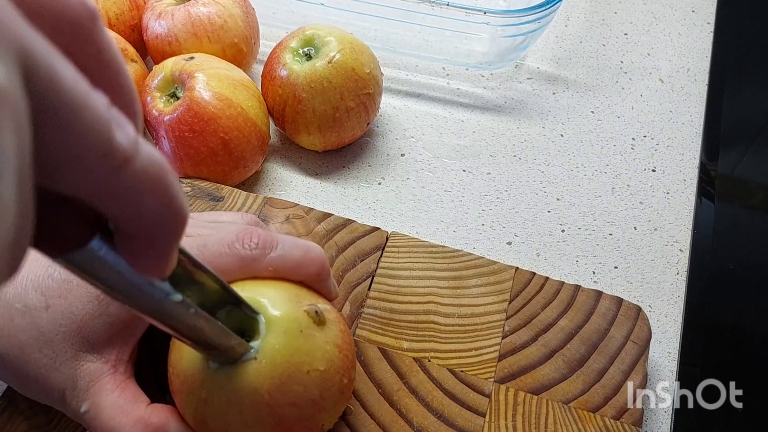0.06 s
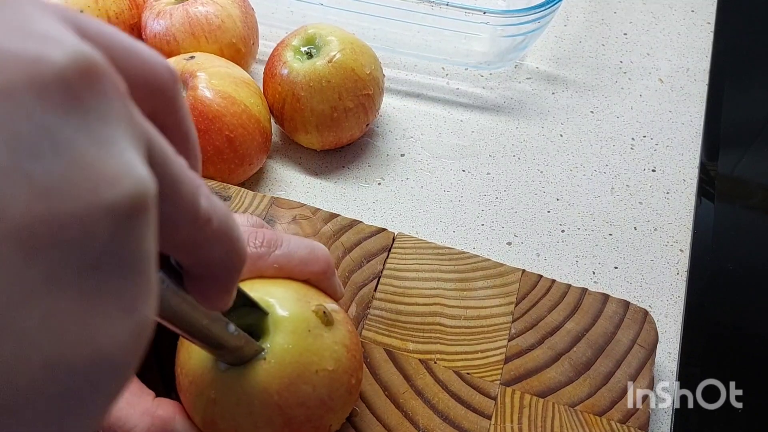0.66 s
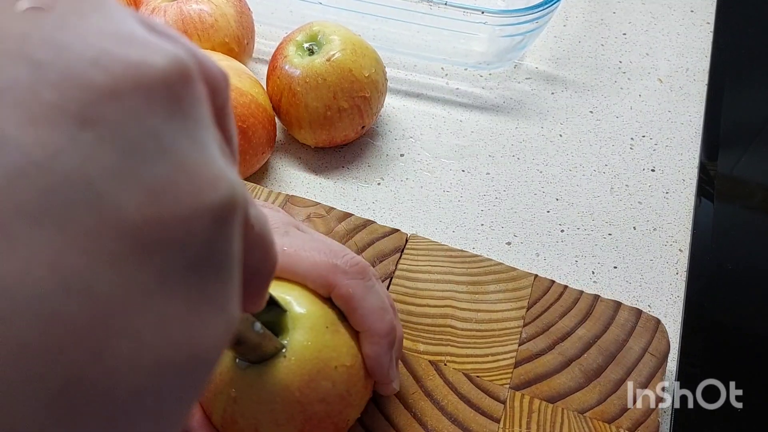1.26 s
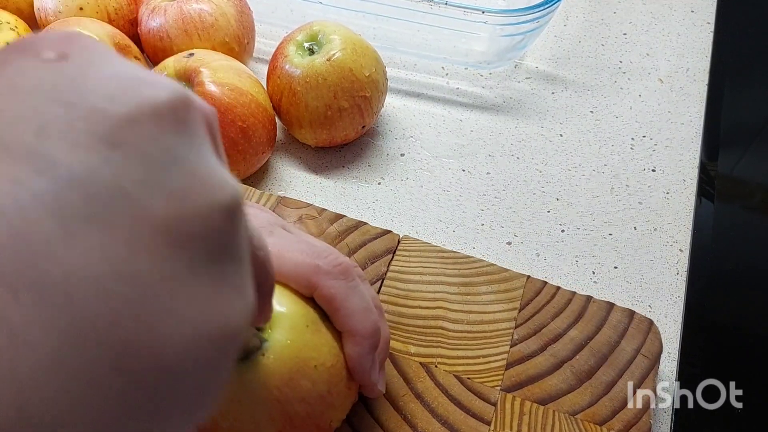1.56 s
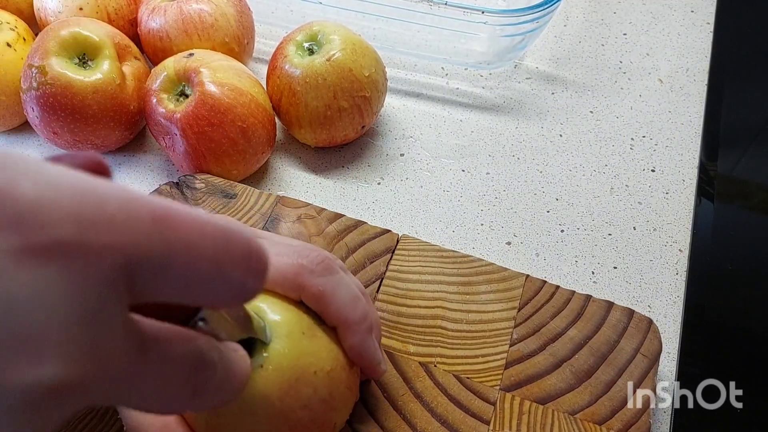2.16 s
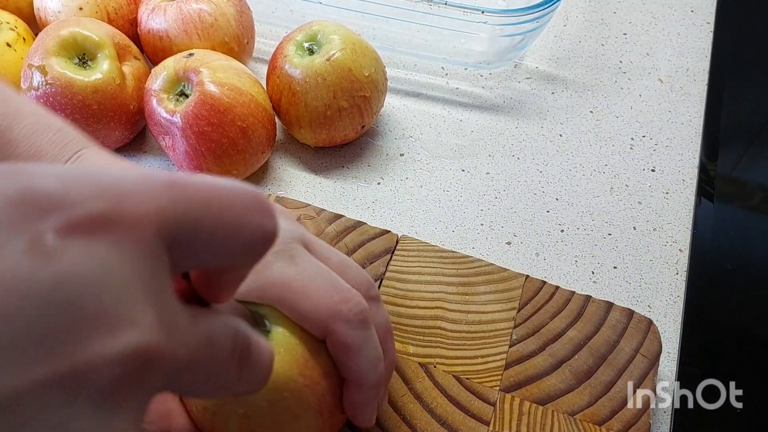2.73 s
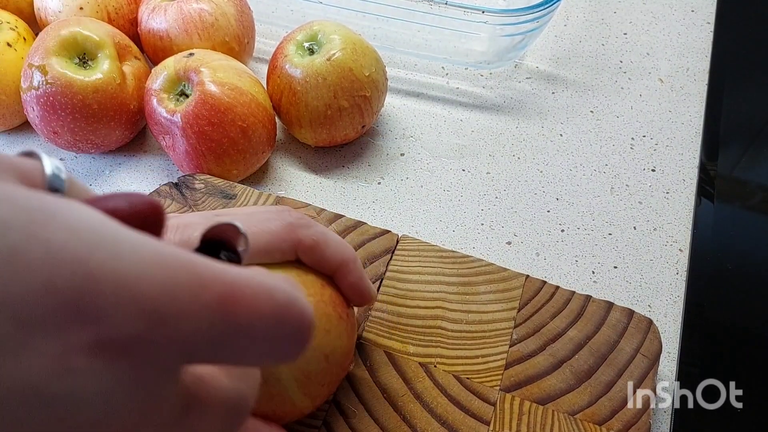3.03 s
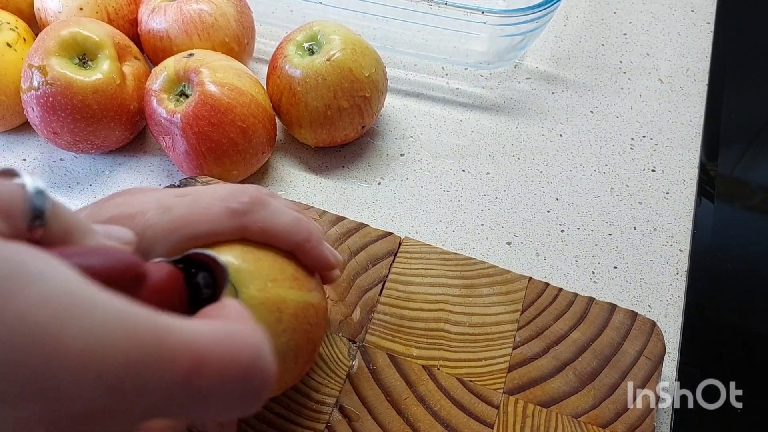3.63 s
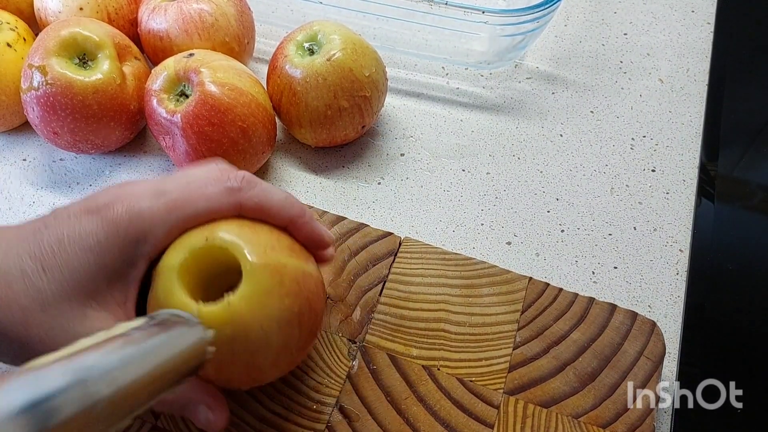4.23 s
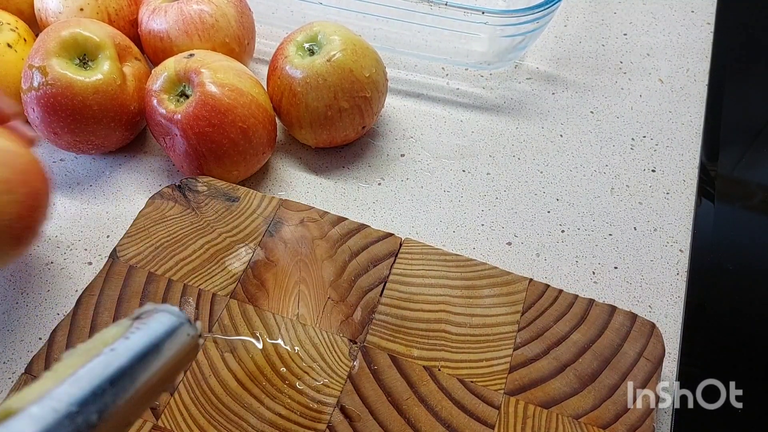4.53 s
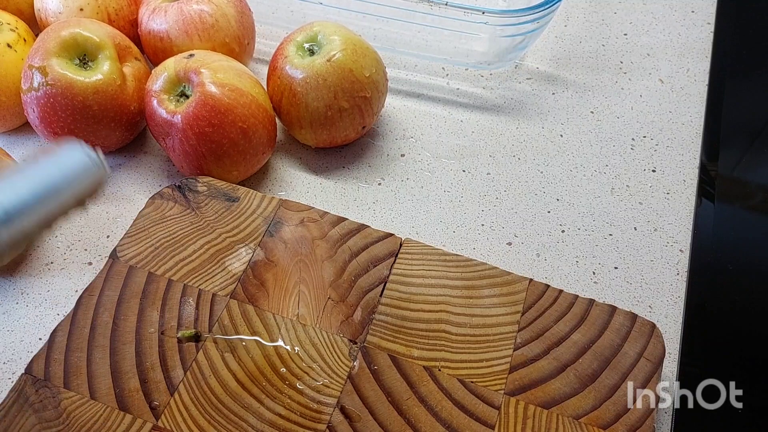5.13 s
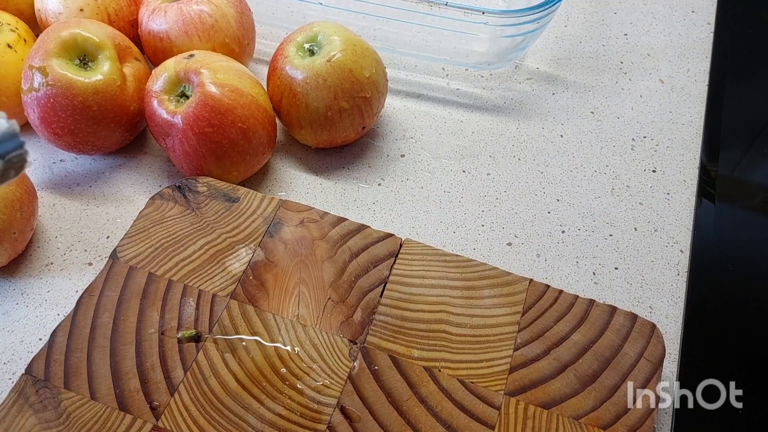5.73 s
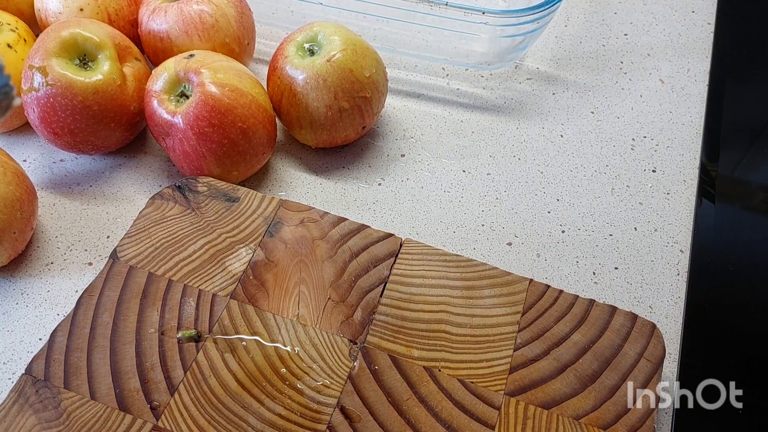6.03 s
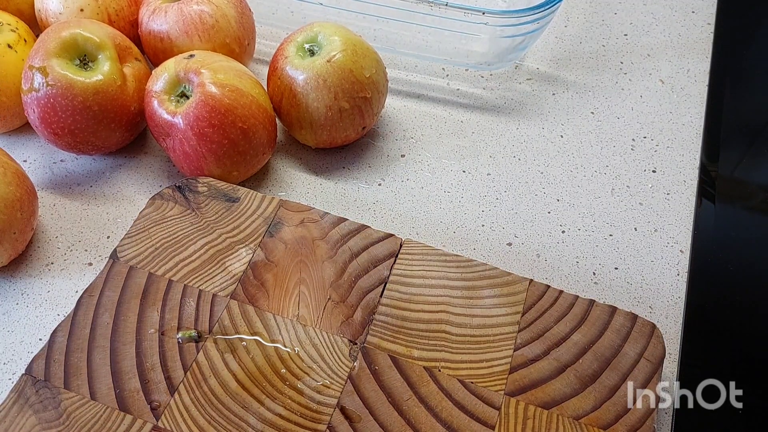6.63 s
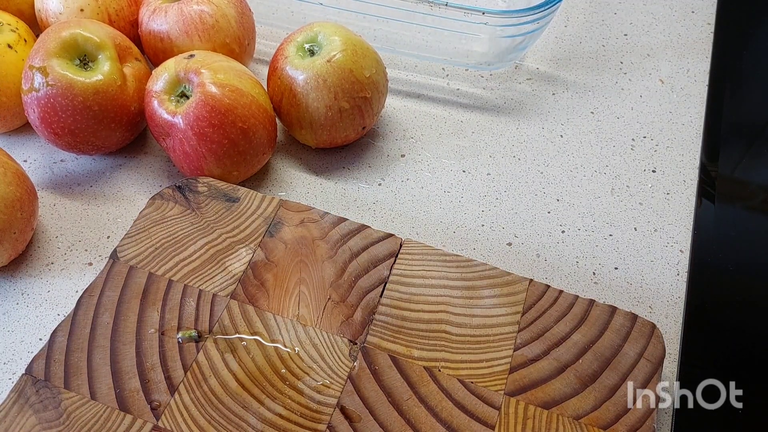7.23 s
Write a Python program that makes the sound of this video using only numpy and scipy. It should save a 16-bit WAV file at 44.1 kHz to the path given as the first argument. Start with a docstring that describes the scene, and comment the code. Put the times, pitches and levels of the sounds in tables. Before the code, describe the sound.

A faint low appliance hum runs throughout in a kitchen. Close by, a soft wet hiss leads to a sharp crunch and thump at 0.35 seconds as a steel corer bites into an apple. At 1.6 seconds a second crunch comes with a loud knock as the tube breaks through and briefly rings the wooden board. From 2 to 4 seconds the corer twists in faint swells of wet hiss, with a light tap and thump around 2.3. A soft suck sinks in pitch at 4 seconds, and the corer clacks free at 4.3, followed by a small thump at 4.7. Farther off, something knocks four times, always alike, at about 2.6, 3.2, 5.1 and 5.8 seconds. Soft distant bumps, a few tiny ticks and very faint high chirps are scattered through, lasting until about 7 seconds.

```python
"""A faint wet hiss, then a crunch: a steel corer is pushed through an apple on a wooden board. Cells burst
and the tube breaks through, ringing the wood. The corer is twisted and drawn out with a wet hiss of
friction, then clacks as it comes free. Something further off in the kitchen knocks four times, always
alike. Small bumps, faint high chirps and ticks, and a low appliance hum lie beneath."""
import sys
import numpy as np
from scipy import signal
from scipy.fft import rfft, irfft, next_fast_len
from scipy.io import wavfile
from scipy.ndimage import map_coordinates

SR = 44100
rng = np.random.default_rng(int(sys.argv[2]) if len(sys.argv) > 2 else 0)


def pcm_store(signal):
    """Save signal as 16-bit PCM."""
    levels = np.round(np.clip(np.atleast_2d(signal), -1, 1) * 32767)
    wavfile.write(sys.argv[1], SR, levels.astype(np.int16).T)


N = 321296
TIME_S = np.arange(N) / SR
TAIL_S = np.arange(SR // 2) / SR  # time since an impact


def amp(db):
    """Decibels to gain."""
    return 10 ** (np.asarray(db) / 20)


def unit(x):
    """Scaled to rms 1."""
    return x / np.sqrt(np.mean(x ** 2) + 1e-20)


def along(points, hz):
    """(f/Hz, value) points read on a log axis."""
    f, value = np.transpose(points)
    return np.interp(np.log(hz + 1), np.log(f + 1), value)


def filtered(x, response):
    """x through a zero-phase frequency response."""
    size = x.shape[-1]
    padded = next_fast_len(size + 8192)
    return irfft(rfft(x, padded) * response(np.fft.rfftfreq(padded, 1 / SR)), padded)[..., :size]


def noise(size=N):
    """Two channels of white noise."""
    return rng.standard_normal((2, size))


def wobble(rate_hz):
    """Smooth random curve, rate_hz knots a second."""
    coarse_s = TIME_S[::16]
    knots = rng.standard_normal(int(N * rate_hz / SR) + 4)
    return np.interp(TIME_S, coarse_s, map_coordinates(knots, [coarse_s * rate_hz]))


def swell(t, width_s, shape=2):
    """Bell around time t; a higher shape has a flatter top and shorter skirts."""
    return np.exp(-.5 * np.minimum(abs((TIME_S - t) / width_s), 10) ** shape)


def onset(attack_s):
    """Soft rise from 0 to 1."""
    return 1 - np.exp(-TAIL_S / attack_s)


def mode(hz, db, t60_s, attack_s=0.0011, phase=0):
    """One damped resonance."""
    envelope = onset(attack_s) * np.exp(-np.log(1000) * TAIL_S / t60_s)
    return amp(db) * envelope * np.sin(2 * np.pi * hz * TAIL_S + phase)


def add(track, t, sound):
    """Mixes a sound into the track at time t."""
    span = track[:, round(t * SR):][:, :sound.shape[-1]]
    span += sound[..., :span.shape[-1]]


# left-right likeness: f/Hz, correlation
COHERENCE = [(30, .5), (100, 0.95), (300, 0.58), (700, .5), (1500, -0.15), (4000, 0)]
def coloured(pair, spectrum):
    """Two unrelated signals become a stereo pair of rms 1, alike in the bass."""
    def response(hz):
        angle = np.arccos(np.clip(along(COHERENCE, hz), -1, 1)) / 2
        return amp(along(spectrum, hz)) * [np.cos(angle), np.sin(angle)]
    mid, side = filtered(pair, response)
    return unit(np.array([mid + side, mid - side]))


def grains(spectrum, per_s):
    """Tiny clicks of random size."""
    return coloured(noise() * (rng.random((2, N)) < per_s / SR), spectrum)


# kitchen decay: f/Hz, t60/s
ROOM_DECAY = [(100, 0.62), (500, 0.28), (1500, 0.3), (5000, 0.25), (15000, 0.14)]
def wash(spectrum, t60_scale):
    """A dying burst of noise; the treble dies first."""
    hz, t, bands = signal.stft(coloured(noise(len(TAIL_S)), spectrum), SR, nperseg=256)
    fade_db = -60 * t / (t60_scale * along(ROOM_DECAY, hz)[:, None])
    return signal.istft(bands * amp(fade_db), SR, nperseg=256)[1][:, :len(TAIL_S)]


def ring(modes, t60_scale, apart_hz):
    """Modes ring out; the higher ones arrive left and right out of step."""
    out = np.zeros((2, len(TAIL_S)))
    for hz, db in modes:
        phase = rng.uniform(0, 2 * np.pi) + np.array([[1], [-1]]) * hz / apart_hz * rng.normal(.22, .34)
        out += mode(hz, db, t60_scale * along(ROOM_DECAY, hz), attack_s=0.0012, phase=phase)
    return out


# appliance partials: f/Hz, level/dB
HUM_PARTIALS = [(99, -57), (198, -59), (301, -65.5), (345, -67.5)]
# brief dips of the hum: t/s, width/s, level/dB
HUM_DIPS = [(6.336, 0.075, -23), (7.224, 0.12, -7)]
# room rush: f/Hz, level/dB
RUSH_SPECTRUM = [(25, -23.5), (55, -6.5), (110, 5.5), (160, -8.5), (210, 4.5), (260, -6), (330, -2.5),
                 (420, -10.5), (650, -11.5), (1200, -15), (2000, -30), (3000, -39.5), (6000, -40.5),
                 (9000, -41.5), (10500, -38), (12000, -41.5), (15500, -44)]
def humming():
    """A wavering mains hum in the low rush of the kitchen."""
    hum = np.zeros(N)
    for hz, db in HUM_PARTIALS:
        peak = np.sqrt(2) * amp(db + 2 * wobble(6.2))
        hum += peak * np.sin(2 * np.pi * hz * TIME_S + 0.59 * wobble(10))
    dips_db = sum(db * swell(t, width_s) for t, width_s, db in HUM_DIPS)
    rush = amp(-53.5 + .7 * wobble(3)) * coloured(noise(), RUSH_SPECTRUM)
    return amp(.5 + dips_db) * hum + rush


# swells of fine hiss, the one at 2.6 s around the first knock: t/s, rise/s, fall/s, level/dB
HISS_SWELLS = [(.02, 0.066, 0.053, -62), (.6, 0.12, 0.11, -69), (1.22, 0.029, 0.057, -73),
               (1.47, 0.084, 0.046, -69.5), (2.1, 0.07, 0.081, -57.5), (2.39, 0.025, 0.037, -67.5),
               (2.6, 0.023, 0.057, -63), (2.882, 0.0448, 0.044, -56), (2.974, 0.06, 0.045, -50.5),
               (3.568, 0.029, 0.058, -56), (3.97, 0.057, 0.1, -64), (5.97, .035, 0.024, -69)]
# fine wet hiss: f/Hz, level/dB
HISS_SPECTRUM = [(1500, -23), (3000, -1), (4500, 2.5), (6500, -3), (8800, -5), (10500, 0), (12300, 1),
                 (15500, -6.5)]
# hollow body: f/Hz, level/dB
BODY_SPECTRUM = [(300, -18.5), (500, -10), (630, -3.5), (820, -12.5), (1150, -3.5), (1490, -2),
                 (1750, -6.5), (2130, -8), (3000, -12.5), (6000, -28)]
# body gain as the tube sinks in: t/s, level/dB
BODY_GROWTH = [(0, 1), (3, 5)]
def hissing():
    """Swells of fine hiss with a hollow body; all but the one at 2.6 s are steel sliding in wet flesh."""
    swells = [amp(db) * swell(t, np.where(TIME_S < t, rise_s, fall_s), shape=1.7)
              for t, rise_s, fall_s, db in HISS_SWELLS]
    # the tube slides on around each crunch
    slides = [amp(db - 27.5) * swell(t + 0.011, width_s=0.066) for t, _, _, db in CRUNCHES]
    envelope = np.linalg.norm(swells + slides, axis=0)
    flicker = amp(.8 * wobble(41))
    hiss = amp(2.5) * grains(HISS_SPECTRUM, per_s=16000)
    growth_db = np.interp(TIME_S, *np.transpose(BODY_GROWTH))
    body = amp(2 + growth_db) * grains(BODY_SPECTRUM, per_s=2200)
    return envelope * flicker * (hiss + body)


# bumps about the kitchen: t/s, level/dB, relative edge level/dB
BUMPS = [(.036, -45.5, -23), (.98, -57, -8.5), (1.15, -46.5, -27), (3.315, -45.5, -11.5), (3.985, -46, -8),
         (5.435, -44.5, -7), (5.94, -50.5, -10), (6.544, -44.5, -9), (6.9, -48, -6.5)]
# dull reverberation: f/Hz, level/dB
BUMP_SPECTRUM = [(100, -2.5), (350, -9.5), (620, 0.5), (1000, -11), (1500, -15), (3000, -45)]
# brighter edge: f/Hz, level/dB
EDGE_SPECTRUM = [(100, -37), (700, -1.5), (1500, 4.5), (2400, -1), (3200, -13.5), (6000, -28), (15000, -54)]
def bumping():
    """Soft distant bumps, mostly reverberation."""
    out = np.zeros((2, N))
    for t, db, edge_db in BUMPS:
        dull = wash(BUMP_SPECTRUM, t60_scale=1.7)
        edge = amp(edge_db) * wash(EDGE_SPECTRUM, t60_scale=2)
        add(out, t, amp(db + 0.5) * onset(0.0042) * (dull + edge))
    return out


# flesh gives way: t/s, rise/s, fall/s, level/dB
CRUNCHES = [(0.338, 0.016, 0.022, -28.5), (1.57, 0.015, 0.019, -30.5)]
# bursting cells: f/Hz, level/dB
FLESH_SPECTRUM = [(40, -46), (300, -4.5), (550, -10), (750, -4.5), (1000, -1.5), (1450, 3.5), (1700, -6.5),
                  (2050, -7), (2600, -9), (4600, -10.5), (6800, -15), (9000, -15), (12500, -12.5),
                  (15500, -20.5)]
def crunching():
    """Under a hard push the cells burst in a quick swell that dies away."""
    push = np.zeros(N)
    for t, rise_s, fall_s, db in CRUNCHES:
        fall = np.exp(-abs((TIME_S - t) / fall_s) ** 1.3)
        push += amp(db) * np.where(TIME_S < t, swell(t, rise_s), fall)
    return push * amp(.5 * wobble(400)) * grains(FLESH_SPECTRUM, per_s=16000)


# apple pressed or rocked on the board: t/s, f/Hz, level/dB, t60/s
THUMPS = [(0.35, 177.6, -22.5, 0.089), (.867, 166, -35.5, 0.075), (2.366, 237, -35, 0.19),
          (4.685, 121, -38, 0.27)]
def thumping():
    """The apple meets the wood skin first, higher and shorter, then with its weight."""
    skin_lead_s = 0.011
    out = np.zeros((2, N))
    for t, hz, db, t60_s in THUMPS:
        skin = mode(2.2 * hz, db - 7, t60_s=0.043)
        room = amp(db - 20.5) * onset(.003) * wash(BUMP_SPECTRUM, t60_scale=1.32)
        add(out, t - skin_lead_s, skin + room)
        add(out, t, mode(hz, db, t60_s))
    return out


# tube bounces on the board: t/s, level/dB
BLOWS = [(1.5776, 1), (1.5852, -10), (1.591, -15)]
# steel on wood: f/Hz, level/dB, t60/s
CONTACT_MODES = [(724, 5, 0.017), (980, 7.5, 0.0082), (1860, -3, 0.0088)]
# board resonances: f/Hz, level/dB
BOARD_MODES = [(96, -5), (142, -3), (226, -2), (336, -10), (495, 0), (538, -1), (643, -5), (707, -5),
               (742, -6), (769, -6), (882, -9), (1038, -13), (1125, -13), (1192, -11), (1281, -15),
               (1386, -18), (1870, -18), (1948, -15)]
# board reflections: f/Hz, level/dB
BOARD_SPECTRUM = [(50, -24), (130, -7), (350, -2), (520, -0.5), (780, -1), (1150, -11), (1400, -14),
                  (2000, -20), (2800, -25.5), (6000, -41), (15000, -46.5)]
def breakthrough():
    """The tube hits the board, which booms on the counter and rings until the hands damp it."""
    out = np.zeros((2, N))
    contact = -sum(mode(hz, db, t60_s, attack_s=0.0015) for hz, db, t60_s in CONTACT_MODES)
    for t, db in BLOWS:
        add(out, t, amp(db) * contact)
    hit_s, boom_lag_s = BLOWS[0][0], .0115
    board = amp(-24) * ring(BOARD_MODES, t60_scale=.9, apart_hz=3000)
    room = amp(-18.5) * wash(BOARD_SPECTRUM, t60_scale=.9)
    damping = np.exp(-(TAIL_S / 0.18) ** 2)
    add(out, hit_s, onset(0.003) * damping * (board + room))
    boom = mode(hz=127, db=-20, t60_s=.13) + mode(hz=84, db=-33.5, t60_s=.28)
    add(out, hit_s + boom_lag_s, boom)
    return out


# high chirps: t/s, width/s, level/dB
CHIRPS = [(1.95, .045, -70.5), (2.11, 0.077, -62), (4.891, .044, -77.5), (5.785, 0.053, -73),
          (6.497, .032, -71.5), (6.594, 0.027, -64.5), (6.704, 0.046, -59)]
# thin hiss: f/Hz, level/dB
SHEEN_SPECTRUM = [(2500, -20), (4200, -8), (4600, 2), (5000, -7), (5800, -6), (7500, -11), (9000, -20),
                  (12000, -17), (13800, -11), (15500, -19)]
def chirping():
    """Faint raspy chirps swell and fade on one note; a thin hiss lingers after the last."""
    centre_hz, half_band_hz = 3640, 390
    rasp = unit(filtered(noise(), lambda hz: 1 / (1 + abs((hz - centre_hz) / half_band_hz) ** 3)))
    envelope = sum(amp(db) * swell(t, width_s) for t, width_s, db in CHIRPS)
    sheen = amp(-69.5) * swell(t=6.94, width_s=0.3, shape=5) * coloured(noise(), SHEEN_SPECTRUM)
    return envelope * rasp + sheen


# light touches of the corer: t/s, level/dB, centre f/Hz
TAPS = [(2.2756, -36, 690), (4.3288, -31.5, 540), (4.667, -46, 1570)]
# corer in the apple: f/Hz, level/dB
CORER_MODES = [(148, 0), (344, -8), (403, -10), (500, -8), (581, 0), (715, -4), (915, -14), (942, -12),
               (1028, -7), (1197, -9), (1340, -8), (1477, -3), (1628, -10), (1798, -14), (1911, -16),
               (2258, -11)]
# corer reflections: f/Hz, level/dB
CORER_SPECTRUM = [(40, -37), (150, -7), (400, -0.5), (650, 2), (1000, -2), (1500, -3), (1900, -9.5),
                  (2400, -7.5), (2900, -19), (3700, -15), (5000, -29.5), (7000, -44), (15000, -72)]
def tapping():
    """A light touch clicks and rings the corer's modes near one pitch."""
    reach_octaves = .4
    out = np.zeros((2, N))
    for t, db, centre_hz in TAPS:
        excited = [(hz, mode_db - 10 * np.log10(1 + (np.log2(hz / centre_hz) / reach_octaves) ** 4))
                   for hz, mode_db in CORER_MODES]
        click = amp(-1) * wash(CORER_SPECTRUM, t60_scale=0.099)
        tube = amp(-2) * ring(excited, t60_scale=0.49, apart_hz=1520)
        room = amp(-8.5) * wash(BUMP_SPECTRUM, t60_scale=1.9)
        add(out, t, amp(db) * onset(0.0013) * (click + tube + room))
    return out


# far knocks: t/s, level/dB, fizz trim/dB
KNOCKS = [(2.588, -3, -1.5), (3.154, 1.5, -1), (5.123, -1.5, -0.5), (5.814, -5.5, -5.5)]
# knocked object: f/Hz, level/dB
KNOCK_MODES = [(215, 0), (255, -9), (296, -2), (333, 1), (352, -4), (376, -7), (635, -4), (707, -12),
               (772, -10), (850, -7), (917, -9), (987, -5), (1098, -5), (1192, -9), (1238, -13),
               (1318, -15), (1386, -15), (1456, -16), (1515, -10), (1547, -13), (1601, -15), (1698, -10),
               (1736, -13), (1765, -10), (1913, -17), (1978, -16), (2034, -15), (2172, -15)]
# knock reflections: f/Hz, level/dB
KNOCK_SPECTRUM = [(50, -25), (130, -6), (175, -14), (220, -1), (270, -9), (350, 2), (500, -9.5),
                  (650, -5.5), (1100, -3.5), (1400, -9), (2050, -9), (2600, -23.5), (4000, -40)]
# soft high fizz on each knock: f/Hz, level/dB
FIZZ_SPECTRUM = [(1500, 6.5), (2500, -1), (4000, 2), (6000, -8.5), (8800, -20.5), (11500, -12),
                 (15500, -22.5)]
def knocking():
    """The same blow by the same path each time builds up, holds briefly and falls, with a soft fizz."""
    hold_s, tail_share = 0.079, .3
    body = amp(-30) * ring(KNOCK_MODES, t60_scale=1, apart_hz=810)
    room = amp(-26.5) * wash(KNOCK_SPECTRUM, t60_scale=1.38)
    release = tail_share + (1 - tail_share) * np.exp(-(TAIL_S / hold_s) ** 2)
    envelope = amp(3.5) * onset(0.0053) * release
    out = np.zeros((2, N))
    for t, db, fizz_db in KNOCKS:
        fizz = amp(fizz_db - 36) * onset(.006) * wash(FIZZ_SPECTRUM, t60_scale=1.38)
        variation = amp(-35.5) * wash(KNOCK_SPECTRUM, t60_scale=0.8)  # no two blows land quite alike
        add(out, t, amp(db) * envelope * (body + room + fizz + variation))
    return out


# bright ticks: t/s, level/dB
TICKS = [(2.649, -42.5), (2.779, -55), (6.795, -62)]
# tick colour: f/Hz, level/dB
TICK_SPECTRUM = [(5000, -30), (9000, -9), (14000, 0)]
def ticking():
    """Tiny clicks high in the treble."""
    out = np.zeros((2, N))
    for t, db in TICKS:
        add(out, t, amp(db) * wash(TICK_SPECTRUM, t60_scale=.2))
    return out


def sucking():
    """As the plug is drawn out, wet friction rings the air in the bore; it deepens and the pitch sinks."""
    mid_s, width_s = 4.025, 0.096
    mid_hz, sink_octaves_per_s, flutter_hz = 1330, 6.5, 240
    bore_hz = mid_hz * 2 ** (-sink_octaves_per_s * np.clip(TIME_S - mid_s, -2 * width_s, 2 * width_s))
    tone = np.sin(2 * np.pi * np.cumsum(bore_hz) / SR)
    flutter = unit(filtered(noise(), lambda hz: np.exp(-.5 * (hz / flutter_hz) ** 2)))
    pull = amp(-52.5 + 2.1 * wobble(110)) * swell(mid_s, width_s, shape=5.8)
    return pull * flutter * tone


# corer comes free: t/s, level/dB
CLACKS = [(4.3335, 0.5), (4.3414, -0.5)]
def clacking():
    """Two quick contacts of the loaded tube, cushioned by the flesh, merge into one clack."""
    out = np.zeros((2, N))
    for t, db in CLACKS:
        crack = amp(-26) * wash(CORER_SPECTRUM, t60_scale=0.18)
        room = amp(-41) * wash(CORER_SPECTRUM, t60_scale=1.47)
        tube = amp(-31.5) * ring(CORER_MODES, t60_scale=0.34, apart_hz=1500)
        add(out, t, amp(db) * onset(0.0007) * (crack + room + tube))
    return out


# stereo balance: f/Hz, left minus right level/dB
BALANCE = [(30, 1), (100, -2), (600, -2), (1100, -3), (2000, -6), (5000, -3), (9000, 0), (14000, -1.5)]
def scene():
    """All sources, heard a little stronger on the right."""
    near = hissing() + sucking() + crunching() + breakthrough() + thumping() + clacking() + tapping()
    kitchen = knocking() + bumping() + ticking() + chirping() + humming()
    return filtered(near + kitchen, lambda hz: amp(along(BALANCE, hz) * np.array([[.5], [-.5]])))


def record(dry):
    """Rounds off the highest peak, thins the deep bass and cuts the top treble."""
    low_hz, top_hz = 38, 15850
    rounded = dry / (1 + dry ** 8) ** (1 / 8)
    return filtered(rounded, lambda hz: (hz < top_hz) * hz ** 2 / np.sqrt(hz ** 4 + low_hz ** 4))


dry = scene()
out = record(dry)
pcm_store(out)
```